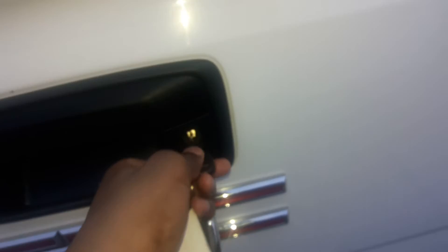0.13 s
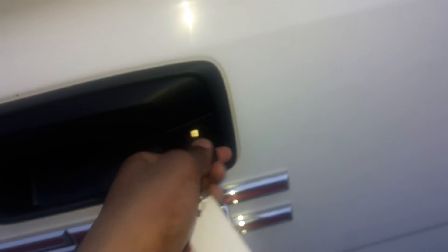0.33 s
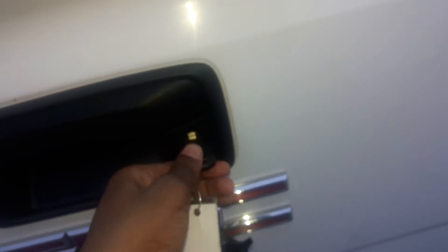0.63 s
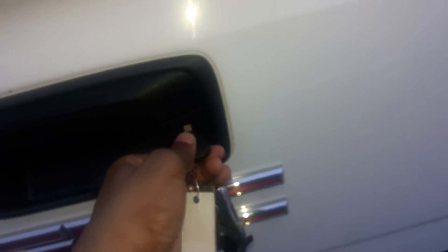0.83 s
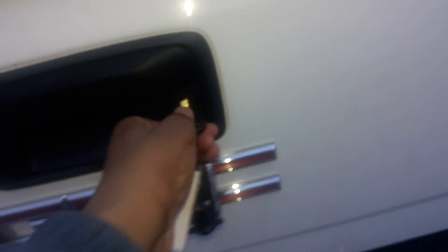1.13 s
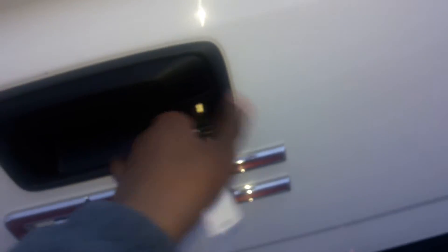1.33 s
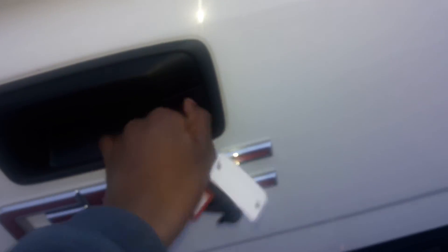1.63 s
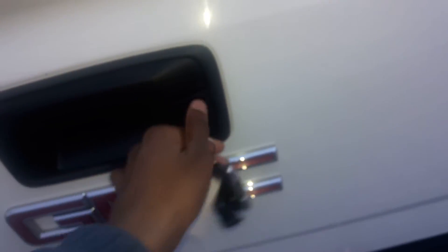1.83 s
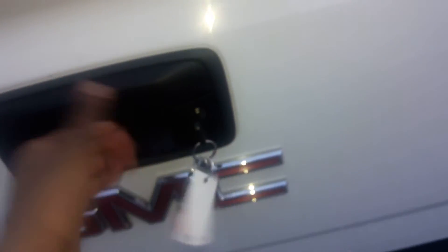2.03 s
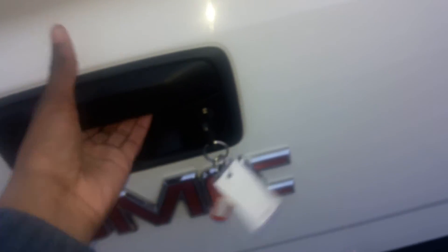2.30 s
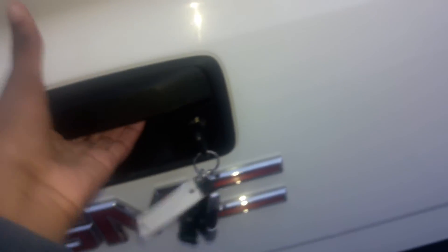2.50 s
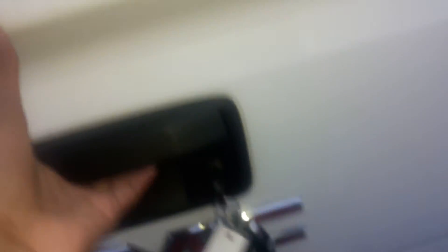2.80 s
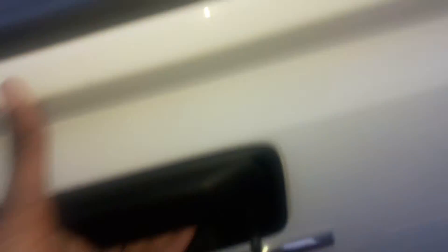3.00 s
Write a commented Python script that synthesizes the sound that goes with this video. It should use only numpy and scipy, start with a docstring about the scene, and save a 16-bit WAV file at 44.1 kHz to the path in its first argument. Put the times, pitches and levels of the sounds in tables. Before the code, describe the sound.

Key clacks a truck tailgate lock, then the latch clunks loudly over distant traffic and wind.

```python
"""A distant roar of traffic opens the scene, slightly to the right; a bunch of keys soon ticks over it.
The key works the lock of a truck's tailgate: the lock throws with a clack, then the latch clunks.
Keys, lock and latch are noise bursts and decaying modes, and the steel panel is a bank of modes.
Traffic and wind are coloured noise; filtered pulses make the thumps of wind on the microphone ports
and the low thuds of the lock and gate."""
import sys
import numpy as np
from scipy import signal
from scipy.fft import rfft, irfft
from scipy.io import wavfile
from scipy.ndimage import uniform_filter1d, minimum_filter1d

SR = 44100
rng = np.random.default_rng(int(sys.argv[2]) if len(sys.argv) > 2 else 0)


def to_wav(sig):
    """Store sig (one row per channel, or 1-D mono) as 16-bit WAV at the path in sys.argv[1].

    Samples outside -1..1 are clipped; the rate is SR.
    """
    pcm = np.clip(np.atleast_2d(sig), -1, 1) * 32767
    pcm = np.round(pcm).astype(np.int16)
    wavfile.write(sys.argv[1], SR, pcm.T)  # frames by channels


N = 138915
T = np.arange(N) / SR


def from_db(db):
    """Decibel law: 20 dB is a factor of ten in amplitude."""
    return 10 ** (np.asarray(db) / 20)


def rms_one(x):
    """Normalisation to unit mean power."""
    return x / np.sqrt(np.mean(x ** 2) + 1e-20)


def level(rows):
    """Amplitude envelope, interpolated in decibels from rows of time_s, level_db."""
    return from_db(np.interp(T, *np.transpose(rows)))


def at_hz(rows, hz, axis=1):
    """Interpolation of one column along a logarithmic frequency axis."""
    rows = np.array(rows)
    return np.interp(np.log(hz + 1e-9), np.log(rows[:, 0]), rows[:, axis])


def colour(x, spectrum):
    """Linear filtering: the spectrum is multiplied by a response, then set to unit power."""
    response = from_db(at_hz(spectrum, np.fft.rfftfreq(N, 1 / SR)))
    return rms_one(irfft(rfft(x) * response, N))


def filt(x, hz, kind, order=2):
    """Butterworth filtering, with a maximally flat passband."""
    sections = signal.butter(order, hz, kind, fs=SR, output="sos")
    return signal.sosfilt(sections, x + 1e-18)


def pan(db):
    """Level-difference panning: left over right in dB, at constant total power."""
    return rms_one(from_db([[db / 2], [-db / 2]]))


def pair(likeness):
    """Interchannel correlation: shared and opposed noise mix to a chosen likeness."""
    c = np.clip(likeness, -1, 1)
    mid, side = rng.standard_normal((2, N))
    return (np.sqrt(1 + c) * mid + np.sqrt(1 - c) * side * [[1], [-1]]) / np.sqrt(2)


def clicks(s, db):
    """Impulse excitation at the given times."""
    out = np.zeros(N)
    places = np.clip((np.asarray(s) * SR).astype(int), 0, N - 1)
    np.add.at(out, places, from_db(db))
    return out


def decay(x, t60):
    """Exponential decay: each impulse falls 60 dB in t60 seconds."""
    return signal.lfilter([1], [1, -from_db(-60 / (t60 * SR))], x + 1e-18)


def ring(x, hz, t60):
    """Damped harmonic oscillator: one mode, of envelope height 1 after a unit impulse."""
    r, w = from_db(-60 / (t60 * SR)), 2 * np.pi * hz / SR
    return signal.lfilter([0, np.sin(w)], [1, -2 * r * np.cos(w), r * r], x + 1e-18)


def grains(per_s, spread_db):
    """Random-arrival process: uneven impulses of either sign, independent in each port."""
    sizes = from_db(spread_db * np.minimum(rng.exponential(1, (2, N)), 4))
    arrivals = rng.random((2, N)) < per_s / SR
    return arrivals * sizes * rng.choice([-1, 1], (2, N))


def tone(hz, width_hz):
    """Narrow-band noise, which is heard as a wavering tone."""
    return rms_one(filt(rng.standard_normal(N), [hz - width_hz / 2, hz + width_hz / 2], "band"))


def chatter(spread_db, grain_s):
    """Amplitude modulation by smoothed noise breaks a tail into small contacts."""
    smooth = uniform_filter1d(rng.standard_normal(N), size=max(int(grain_s * SR), 1))
    return rms_one(from_db(spread_db * np.clip(rms_one(smooth), -2, 2)))


FLUTTER_DB, FLUTTER_T60_S = -25, 0.03  # relative to the impulse, before filtering
THUMP_LOW_HZ, THUMP_TOP_RATIO = 111, 1.55


def thump(peak_s, db, edge_hz):
    """Band-limited pressure pulse: a filtered impulse peaks at peak_s, with a short flutter."""
    age = T[:SR // 20]
    flutter = rng.standard_normal(len(age)) * from_db(FLUTTER_DB - 60 * age / FLUTTER_T60_S)
    pulse = filt((age == 0) + flutter, edge_hz, "low")
    pulse = filt(pulse, THUMP_TOP_RATIO * edge_hz, "low", order=5)
    pulse = filt(pulse, THUMP_LOW_HZ, "high")
    start = int(peak_s * SR) - np.argmax(pulse[:int(2 * SR / edge_hz)])
    return np.pad(pulse / np.abs(pulse).max() * from_db(db), (start, N))[:N]


# spectrum of the far roar: pitch_hz [Hz], level_db [dB, relative]
TRAFFIC_COLOUR = [(24,-47),(45,-17.5),(100,-7.5),(230,-5.5),(300,-6),(450,-10.5),(620,-10),(760,-4.5),(1000,-7.5),(1400,-10.5),(2000,-21),(2500,-33.5),(3200,-45),(4200,-48.5),(5800,-64),(7400,-62),(16000,-74)]
# strength of the roar: time_s [s], level_db [dB]
TRAFFIC_LEVEL = [(0,-33),(.3,-29.5),(.7,-32.5),(2.3,-32),(3.15,-35)]
# engine tones: pitch_hz [Hz], width_hz [Hz], level_db [dB]
ENGINE_TONES = [(252.7,11.2,-43),(273.6,6.8,-44.5),(725,42,-48)]
TRAFFIC_LAG_S, TRAFFIC_LIKENESS, TRAFFIC_PAN_DB = 0.00034, 0.64, -0.5


def traffic():
    """Arrival-time difference: a far roar with a few engine tones reaches the right port first."""
    roar = colour(pair(TRAFFIC_LIKENESS), TRAFFIC_COLOUR) * level(TRAFFIC_LEVEL)
    engines = sum(from_db(db) * tone(hz, width) for hz, width, db in ENGINE_TONES)
    left, right = roar + engines
    late_left = np.interp(T - TRAFFIC_LAG_S, T, left)
    return np.array([late_left, right]) * pan(db=TRAFFIC_PAN_DB)


# strength of the wind: time_s [s], level_db [dB]
WIND_LEVEL = [(0,-49),(.27,-45),(.55,-49),(.85,-57),(1.0,-30.5),(1.2,-48),(1.31,-28),(1.45,-40),(1.63,-35),(1.75,-22),(1.93,-22.5),(2.05,-32),(2.22,-26.5),(2.33,-36),(2.4,-24.5),(2.49,-29.5),(2.59,-22),(2.68,-22),(2.73,-27),(2.86,-24.5),(2.98,-34),(3.15,-27)]
# spectrum of the wind: pitch_hz [Hz], level_db [dB, relative]
WIND_COLOUR = [(30,-36),(60,-14),(120,-3.5),(190,-4),(350,-12.5),(700,-22.5),(1400,-40),(7000,-95.5)]
WIND_PAN_DB, WIND_PUFFS_PER_S, WIND_SPREAD_DB = -5.5, 700, 2.5


def wind():
    """Shot noise: many uneven puffs merge into a lumpy rumble."""
    puffs = grains(WIND_PUFFS_PER_S, WIND_SPREAD_DB)
    return level(WIND_LEVEL) * colour(puffs, WIND_COLOUR) * pan(db=WIND_PAN_DB)


# low thumps: wind on the ports, and two thuds of the lock's throw at 1.73-1.74 s:
# peak_s [s], level_db [dB, peak before panning], upper_edge_hz [Hz], left_right_db [dB]
LOW_THUMPS = [(1.132,-16,200,-16),(1.674,-11,380,-27),(1.7295,-9,420,-2),(1.7415,-10,300,-6),(1.7518,-7,600,-21),(1.765,-8,330,-26),(1.7945,-9,700,-23),(1.8105,-7,278,-22),(1.8312,-7,540,-37),(1.8435,-11,560,-27),(1.8735,-8,630,-25),(1.9083,-7,850,-40),(1.927,-7,210,-12),(2.224,-13.5,400,-18),(2.4065,-10.5,650,-22),(2.5692,-6,520,-28),(2.5772,-9,520,-25),(2.5875,-6.5,330,12),(2.6147,-1.5,1300,-27),(2.6302,-9,950,-21),(2.6362,0,480,-33),(2.643,-4,520,-22),(2.6452,0,1400,-41),(2.6645,-10,350,8),(2.6955,-5,280,-31),(2.7001,-6,720,-25),(2.709,-6.5,850,-32),(2.7116,-9,1000,-22),(2.8552,-10,900,-26),(2.8988,-11,400,-12),(3.0098,-9.5,850,-19),(3.0133,-9.5,900,-28),(3.027,-15,900,-24),(3.0865,-10,650,-29)]
# the hardest wind thumps overload the port and snap; snap level is relative to the thump
SNAP_FROM_DB, SNAP_DB, SNAP_HZ = -3, -18, 3100


def low_thumps():
    """Pressure pulses: wind thumps lie mostly on one port, the lock's two thuds in both."""
    out = np.zeros((2, N))
    for peak_s, db, edge_hz, pan_db in LOW_THUMPS:
        pulse = thump(peak_s, db, edge_hz)
        if db > SNAP_FROM_DB:
            snap = filt(clicks([peak_s], db + SNAP_DB), SNAP_HZ, "low", order=8)
            pulse = pulse + snap * SR / (2 * SNAP_HZ)  # make up the height lost in filtering
        out += pulse * pan(pan_db) / np.sqrt(2)
    return out


# swell of the low rumble as the key goes in: time_s [s], level_db [dB]
RUMBLE_LEVEL = [(0,-51),(.15,-40.5),(.21,-30.5),(.36,-31.5),(.48,-45),(.7,-49)]
# spectrum of the rumble: pitch_hz [Hz], level_db [dB, relative]
RUMBLE_COLOUR = [(40,-50),(110,-21),(150,-5),(175,2),(250,-13),(400,-15),(4000,-110)]


def rumble():
    """Low-frequency coloured noise, largely coherent between the ports."""
    return level(RUMBLE_LEVEL) * colour(pair(0.8), RUMBLE_COLOUR)


# rustle of the key and its bunch: time_s [s], level_db [dB]
RUSTLE_LEVEL = [(0,-83),(.14,-66),(.19,-60),(.33,-59),(.39,-66),(.5,-77.5),(.65,-55),(.77,-75),(.87,-62),(.92,-75),(1.03,-64),(1.24,-84),(1.36,-61),(1.42,-65),(1.49,-59),(1.6,-70.5),(1.75,-42),(1.82,-65),(1.97,-70),(2.1,-67),(2.18,-54.5),(2.22,-65),(2.33,-59.5),(2.47,-61),(2.53,-78),(3.0,-73.5),(3.08,-63.5),(3.15,-50)]
# spectrum of the rustle: pitch_hz [Hz], level_db [dB, relative]
RUSTLE_COLOUR = [(2500,2),(4200,4),(6000,-4.5),(6900,-3),(7400,5),(8100,-4.5),(9500,-9),(12000,-8.5),(16000,-22)]
# the blade slides into the keyway: time_s [s], level_db [dB]
SLIDE_LEVEL = [(0,-110),(.15,-90),(.2,-72),(.33,-67),(.37,-85),(.5,-110)]
# spectrum of the sliding blade: pitch_hz [Hz], level_db [dB, relative]
SLIDE_COLOUR = [(3000,-13),(8500,-6),(11000,7),(12500,4),(13500,-15),(16000,-20)]
CONTACTS_PER_S, CONTACT_SPREAD_DB, CONTACT_T60_S = 1000, 3.6, 0.02


def rustle():
    """Friction as a train of micro-impacts: the bunch shifts and the blade rasps in."""
    contacts = np.abs(grains(CONTACTS_PER_S, CONTACT_SPREAD_DB)[0])
    friction = pair(0.064) * decay(contacts, CONTACT_T60_S)
    bunch = level(RUSTLE_LEVEL) * colour(friction, RUSTLE_COLOUR)
    blade = level(SLIDE_LEVEL) * colour(friction[::-1], SLIDE_COLOUR)  # ports swapped
    return bunch + blade


# keys touch: start_s [s], then level_db [dB, before the trims below] in the low, middle and high band
KEY_TICKS = [(0.179,-42,-55,-67),(0.195,-51,-49,-61),(.322,-52,-58,-62),(0.521,-51,-58,-66),(.548,-44.5,-60,-68),(0.617,-48,-55,-65),(.638,-48,-49,-58),(0.651,-56,-51,-59),(.668,-53,-48,-60),(0.727,-48,-53,-65),(.817,-42,-43,-54),(0.944,-38.5,-38.5,-49),(.978,-48,-42,-54),(1.298,-57,-55,-62),(1.3457,-50,-51,-38),(1.361,-48,-57,-52),(1.374,-52,-58,-57),(1.4615,-39,-43,-49),(1.6875,-32,-30,-30),(1.714,-41,-32.5,-35),(1.735,-35,-43,-48),(1.755,-44,-56,-47),(1.793,-49,-64,-58),(1.835,-50,-61,-68),(1.8651,-34.5,-28.5,-37),(1.888,-39,-49,-55),(2.01,-40,-42,-45),(2.25,-52,-56,-66),(2.356,-52,-61,-76),(2.669,-58,-56,-78),(2.834,-41,-39.5,-52),(3.0988,-44.5,-61,-71)]
# edges of those three bands: pitch_hz [Hz]
KEY_BAND_EDGES = [2800, 6000, 10000, 16000]
# ringing of the keys: pitch_hz [Hz], level_db [dB, relative, before random spread], t60_s [s]
KEY_MODES = [(3650,0,.008),(4340,-3,.015),(7305,3,.022),(7510,-8,.05),(8700,3,.005),(10100,-4,.03),(11600,8,.007),(12250,1,.02)]
# where the bunch hangs: time_s [s], left_right_db [dB]
KEY_PLACE = [(.65,2),(1.3,-2.5),(1.9,-2.5),(2.5,4)]
TICK_DB, TICK_T60_S = -3.5, 0.019
TAIL_DB, TAIL_T60_S = -17, 0.12  # relative to the tick
KEY_RING_DB, KEY_RING_SPREAD_DB = -4.5, 6.1  # relative to the tick
TICK_GRAIN_DB, TICK_GRAIN_S = 4, 0.003  # the keys chatter after a touch


def keys():
    """Impact excitation: each touch is a bright crack with a faint tail and rings the key modes."""
    start_s, *bands_db = np.transpose(KEY_TICKS)
    uneven = chatter(TICK_GRAIN_DB, TICK_GRAIN_S)
    out = np.zeros((2, N))
    for db, low, high in zip(bands_db, KEY_BAND_EDGES, KEY_BAND_EDGES[1:]):
        tick_db = db + TICK_DB
        touch = clicks(start_s, tick_db)
        tail = from_db(TAIL_DB) * decay(touch, TAIL_T60_S) * uneven
        crack = pair(0.033) * (decay(touch, TICK_T60_S) + tail)
        # make up the power that band-filtering removes
        out += filt(crack, [low, high], "band", order=3) * np.sqrt(SR / 2 / (high - low))
        for hz, mode_db, t60 in KEY_MODES:
            if low <= hz < high:
                for side in out:
                    spread_db = rng.normal(0, KEY_RING_SPREAD_DB, len(start_s))
                    strike = clicks(start_s, tick_db + KEY_RING_DB + mode_db + spread_db)
                    side += ring(strike, hz, t60)
    return out * level(KEY_PLACE) ** np.array([[0.5], [-0.5]])


# modes of the steel panel: pitch_hz [Hz], level_db [dB, relative, before random spread], t60_s [s]
PANEL_MODES = [(178,6,.55),(240,-9,.42),(287,-3,.43),(438,-5,.4),(572,-7,.45),(650,-6,.38),(802,-10,.38),(870,-10,.35),(1262,-17,.2),(1623,-7,.18),(1675,-12,.2),(1978,-16,.25),(2137,-16,.22),(2526,-20,.22)]
# heavy blows on the panel: start_s [s], level_db [dB, before mode levels]
PANEL_BLOWS = [(1.711,-35),(2.748,-27),(2.763,-27.5),(2.796,-35.5)]
PANEL_PAN_DB, PANEL_SPREAD_DB = -3, 4.5


def panel():
    """Modal superposition: the tailgate's skin rings under the heavy blows."""
    start_s, db = np.transpose(PANEL_BLOWS)
    out = np.zeros(N)
    for k, (hz, mode_db, t60) in enumerate(PANEL_MODES):
        spread_db = rng.normal(0, PANEL_SPREAD_DB, len(start_s))
        strike = clicks(start_s, db + mode_db + spread_db)
        out += (-1) ** k * ring(strike, hz, t60)  # neighbours in opposite phase
    return pan(db=PANEL_PAN_DB) * out


RATTLE_DB, RATTLE_GRAIN_S = 3.5, 0.003  # the rods rattle after a blow


def blow(rows, bands, alike_below_hz):
    """High modal density: half-octave noise bands each rise and die at their own pace."""
    hit = clicks(*np.transpose(rows))
    edges = 62 * 2 ** (np.arange(17) / 2)
    rattle = chatter(RATTLE_DB, RATTLE_GRAIN_S)
    out = np.zeros((2, N))
    for low, high in zip(edges, edges[1:]):
        hz = np.sqrt(low * high)
        t60, rise = at_hz(bands, hz, axis=2), at_hz(bands, hz, axis=3)
        rise_t60 = min(rise * np.log(1000), t60 / 2)  # time constant to 60 dB time
        envelope = decay(hit, t60) - decay(hit, rise_t60)
        likeness = 1 / (1 + (hz / alike_below_hz) ** 2)
        noise = filt(pair(likeness), [low, high], "band", order=3)
        noise /= np.sqrt(uniform_filter1d(np.mean(noise ** 2, axis=0), size=1500) + 1e-12)
        uneven = rattle if low * RATTLE_GRAIN_S > 2 else 1  # upper bands only
        out += from_db(at_hz(bands, hz)) * envelope * noise * uneven
    return out


# the key seats, then the cylinder meets its stop: start_s [s], level_db [dB, before band levels]
LOCK_SNAPS = [(.352,-26.5),(1.663,-25)]
# resonance of the snaps: pitch_hz [Hz], level_db [dB, relative], t60_s [s], rise_s [s, time constant]
SNAP_BANDS = [(200,-18,0.039,0.0012),(700,-3,.04,0.00045),(1590,-1,0.045,0.00046),(2400,-6.5,0.018,.0004),(3220,-2,0.022,0.00036),(4500,-6,0.011,0.00044),(6600,-17,0.015,0.00031),(15000,-27,.03,.0004)]
CRACK_DB, CRACK_LOW_HZ, CRACK_HIGH_HZ = 22, 2600, 4300  # gain on the band-filtered snap


def lock_snaps():
    """Impulsive contact: a band-limited crack leads into the lock's dense resonance."""
    crack = filt(clicks(*np.transpose(LOCK_SNAPS)), [CRACK_LOW_HZ, CRACK_HIGH_HZ], "band")
    body = blow(LOCK_SNAPS, SNAP_BANDS, alike_below_hz=660)
    return (body + crack * from_db(CRACK_DB)) * pan(db=0.5)


# resonance of the throw: pitch_hz [Hz], level_db [dB, relative], t60_s [s], rise_s [s, time constant]
THROW_BANDS = [(81,-20,0.21,0.013),(172,6,0.42,0.011),(400,-11,.25,0.0039),(900,-2,.12,0.00055),(1600,-4,0.057,0.0006),(3000,-8,0.07,0.00052),(5960,-20.5,0.11,0.00065),(15000,-23,.1,0.00069)]
THROW_S, THROW_DB = 1.709, -19  # level before band levels


def lock_throw():
    """Impact of the lock throwing: damped resonance, strongest low down."""
    return blow([(THROW_S, THROW_DB)], THROW_BANDS, alike_below_hz=1100) * pan(db=-2.5)


# resonance of the latch: pitch_hz [Hz], level_db [dB, relative], t60_s [s], rise_s [s, time constant]
LATCH_BANDS = [(81,-25,0.55,0.013),(176,-2,.55,0.0038),(400,-8.5,0.49,0.002),(750,-4.5,0.22,0.0011),(1430,-9,0.19,.0015),(2940,-11.5,0.125,0.00061),(4860,-24.5,0.15,.001),(7500,-16,0.1,0.00055),(11000,-31,0.1,0.00086),(15000,-34,0.083,.001)]
LATCH_S, LATCH_DB = 2.7465, -11.5  # level before band levels


def latch_release():
    """Frequency-dependent damping: the latch lets go and its lows outlast its highs."""
    return blow([(LATCH_S, LATCH_DB)], LATCH_BANDS, alike_below_hz=660) * pan(db=0.5)


# the gate jolts against its catches: peak_s [s], level_db [dB, peak before panning], upper_edge_hz [Hz]
GATE_JOLTS = [(2.7505,-13,350),(2.7625,-10,800),(2.7678,-6,380),(2.7968,-9,420)]


def gate_jolts():
    """Low-frequency pressure pulses as the gate jolts against its catches."""
    return sum(thump(*row) for row in GATE_JOLTS) * pan(db=3)


def scene():
    """Superposition: background, keys, lock and latch add linearly in the open air."""
    background = traffic() + wind() + rumble()
    bunch = rustle() + keys()
    tailgate = panel() + lock_snaps() + lock_throw() + latch_release() + gate_jolts()
    return background + low_thumps() + bunch + tailgate


CEILING, LIMITER_S, CUTOFF_HZ = 0.93, 0.004, 16900  # ceiling in full-scale amplitude


def record(dry):
    """Peak limiting by a smoothed gain, then a steep low-pass cut of the top."""
    window = int(LIMITER_S * SR)
    needed = CEILING / np.maximum(np.abs(dry), CEILING)
    gain = uniform_filter1d(minimum_filter1d(needed, size=window), size=window)
    top_cut = signal.cheby2(14, 70, CUTOFF_HZ, fs=SR, output="sos")
    return signal.sosfilt(top_cut, dry * gain)


dry = scene()
out = record(dry)
to_wav(out)
```